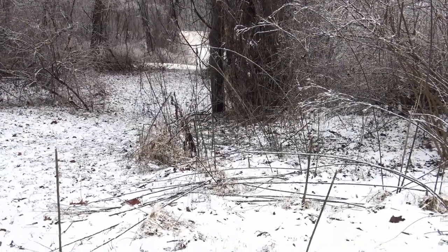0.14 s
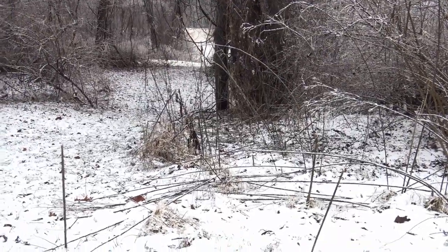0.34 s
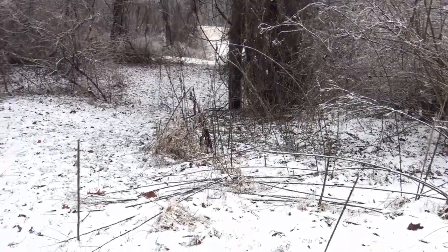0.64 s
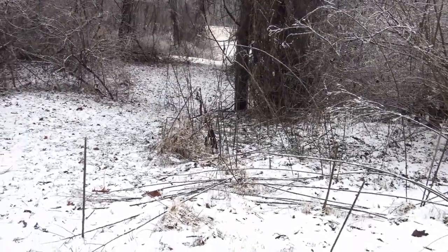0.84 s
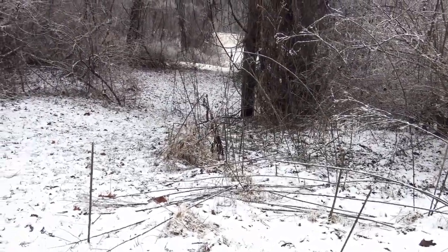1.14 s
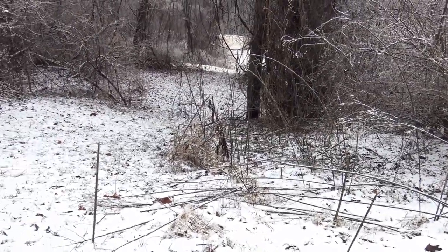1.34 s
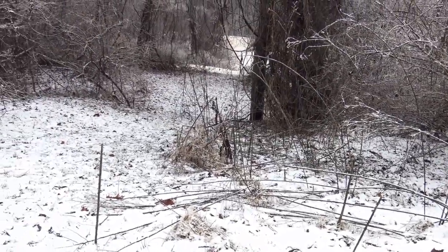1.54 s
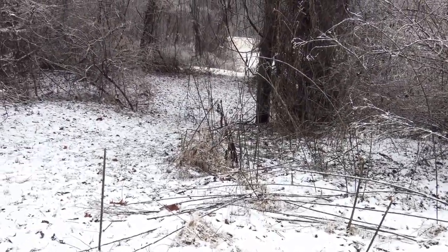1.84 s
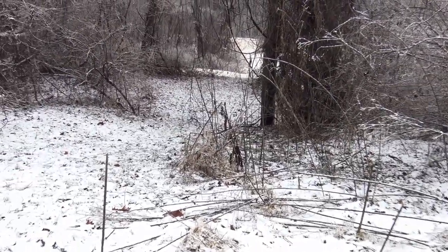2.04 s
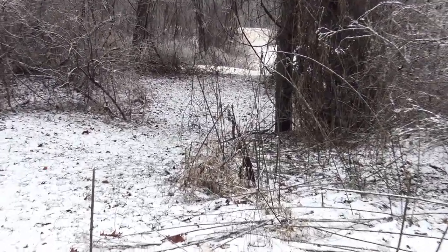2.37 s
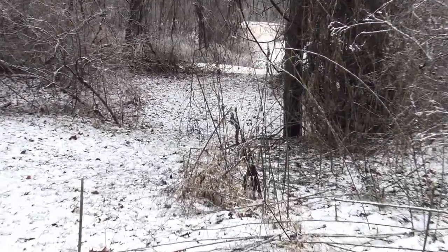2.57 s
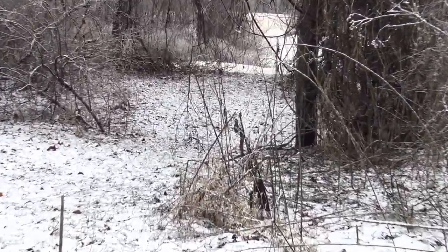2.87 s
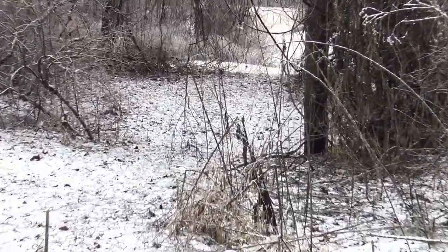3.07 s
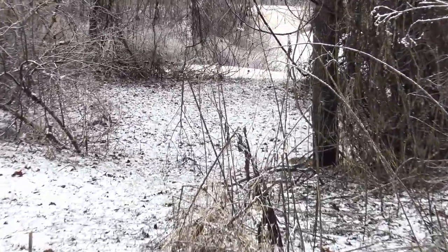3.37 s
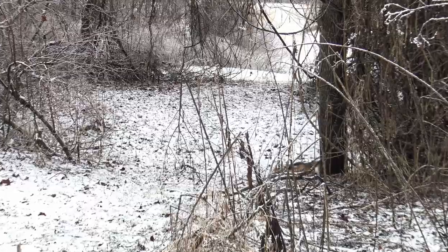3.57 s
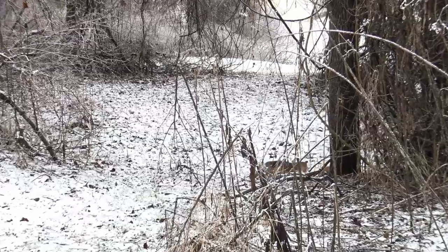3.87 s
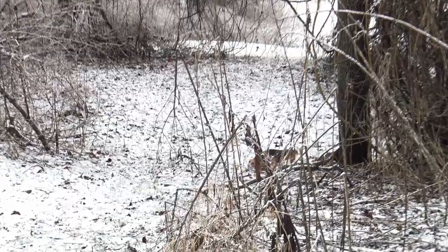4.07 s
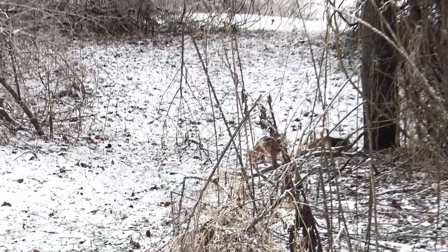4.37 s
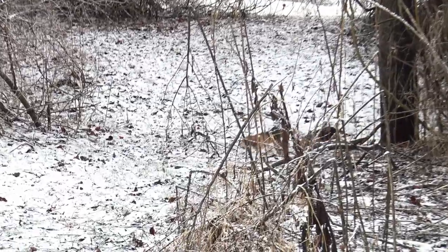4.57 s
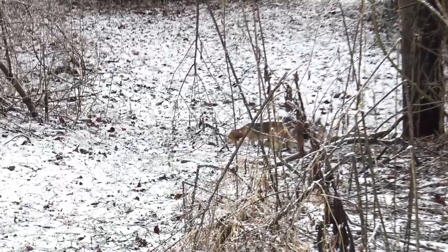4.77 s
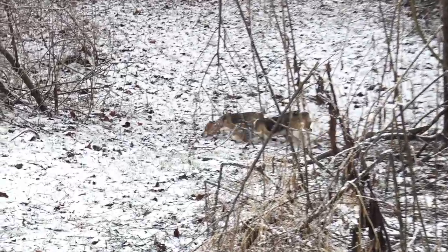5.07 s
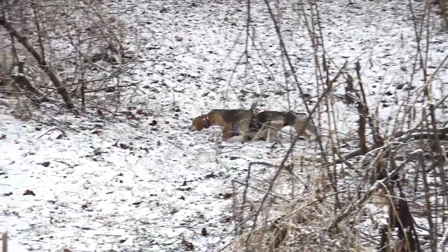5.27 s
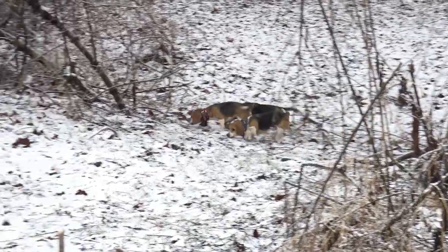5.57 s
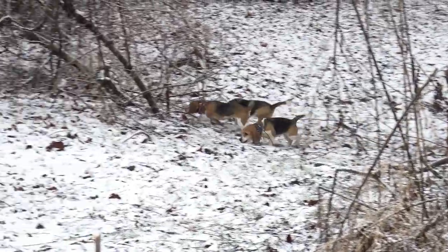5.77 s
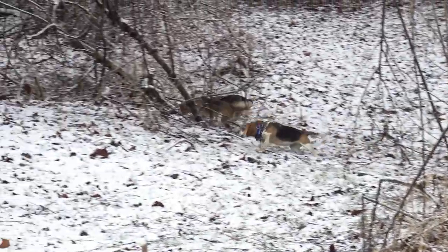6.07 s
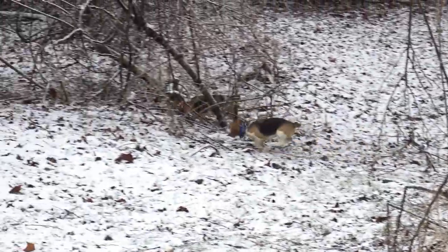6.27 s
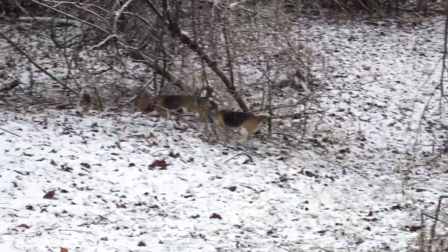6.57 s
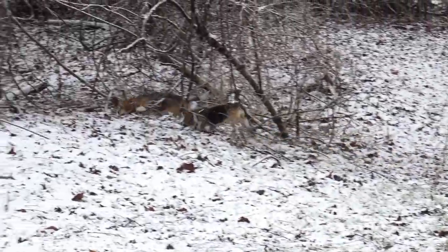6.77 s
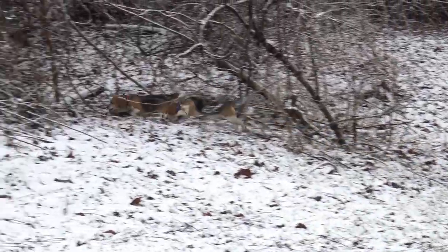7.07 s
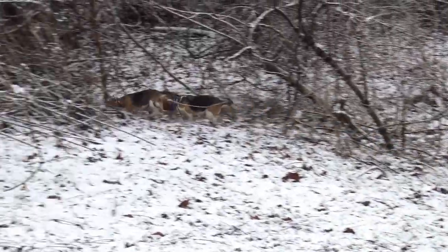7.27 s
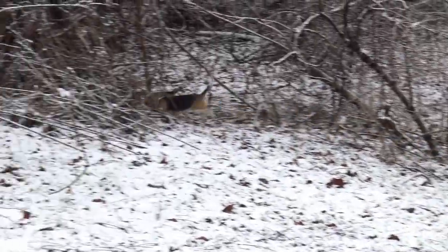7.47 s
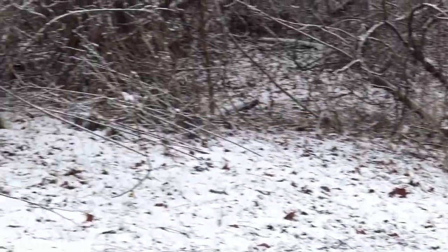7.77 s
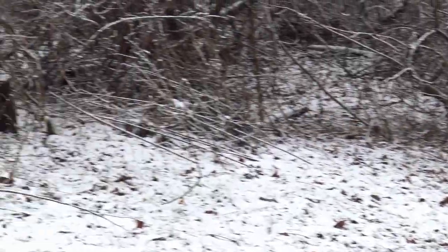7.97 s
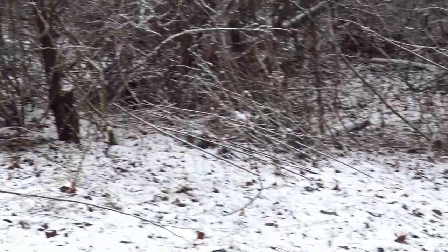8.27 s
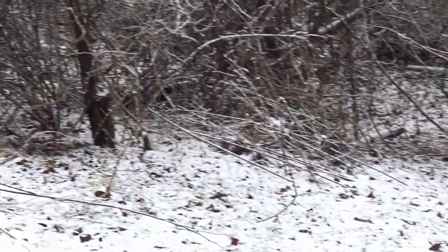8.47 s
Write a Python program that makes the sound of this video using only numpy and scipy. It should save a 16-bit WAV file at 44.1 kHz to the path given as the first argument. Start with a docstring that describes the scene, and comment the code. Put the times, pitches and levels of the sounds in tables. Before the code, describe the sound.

In a winter wood, three hunting dogs start calling almost together as several nearby twigs snap. One gives short level howls, another falling cries, and the third yelps and barks hoarsely. A louder twig cracks, and the pack keeps baying to the end, a little raspier, with quiet grunts in the gaps. The dogs are heard from a distance, slightly right of centre, with a soft echo and a gentle rush of air.

```python
"""Three hounds follow a scent through snowy woodland, some way off, over a soft, steady outdoor rush.
They open almost together, vocal folds pulsing through their mouths, as twigs snap close by: one howls
on a level note, one cries on a falling note, one yelps in head voice and breaks into a hoarse chop.
Trunks scatter each call into a soft tail, and low grunts fall in between. At 3.4 s a louder twig cracks;
the pack bays on to the end, raspier as it runs out of the brush and a little to the left."""
import sys
import numpy as np
from scipy import signal
from scipy.fft import rfft, irfft, next_fast_len
from scipy.io import wavfile
from scipy.ndimage import uniform_filter1d, minimum_filter1d, map_coordinates

SR = 44100
rng = np.random.default_rng(int(sys.argv[2]) if len(sys.argv) > 2 else 0)


def wrap_up_sound(samples):
    """Save the sound to the file named by the first command line argument, as 16-bit audio."""
    columns = np.atleast_2d(samples).T
    # keep every value between -1 and 1, then stretch to whole-number steps
    tamed = np.clip(columns, -1, 1)
    steps = np.round(tamed * 32767).astype(np.int16)
    wavfile.write(sys.argv[1], SR, steps)


N = 380583


def folds(pitch, harmonics_db, rough, waver=0.01093, jitter=0.0471, flutter_hz=400):
    """Self-sustained oscillation: harmonics and their phase; roughness varies cycle length and size."""
    n = len(pitch)
    drift = waver * (wobble(70, n) + .7 * wobble(170, n)) + jitter * rough * wobble(420, n)
    phase = 2 * np.pi * np.cumsum(pitch * (1 + drift)) / SR
    # period doubling: every other cycle is weaker in spells
    size = 1 + rough * (.32 * wobble(30, n) * np.cos(phase / 2) + .4 * wobble(300, n))
    out = np.zeros(n)
    for k, db in enumerate(harmonics_db, 1):
        chaos = np.minimum(rough * .24 * k ** 1.35, .97)
        clean = np.sqrt(1 - chaos ** 2) * np.sin(k * phase)
        torn = wobble(flutter_hz, n) * np.sin(k * phase) + wobble(flutter_hz, n) * np.cos(k * phase)
        out += amp(db) * (clean + chaos * torn / np.sqrt(2))
    return np.sqrt(2) * size * out, phase


def hound(calls, mouth, release_s, settle_s, drop, catch, jaw_lag, fade_db, open_db, rasp_db):
    """Source-filter model: jaw and mouth weight the folds' harmonics. Returns voice and rasp."""
    track = np.zeros((2, N))
    # calls: t/s, length/s, attack/s, start f/Hz, held f/Hz, end f/Hz,
    # level/dB of three bands (fundamental, second, upper harmonics), fundamental swell/dB, roughness
    for onset, length, attack, start_hz, held_hz, end_hz, *levels_db, swell_db, rough in calls:
        t, progress, gate = envelope(length, attack, release_s)
        pitch = held_hz + (start_hz - held_hz) * np.exp(-t / settle_s)
        pitch += (end_hz - held_hz) * progress ** drop
        jaw = np.sin(np.pi * progress ** jaw_lag) - 2 / np.pi  # a lag above 1 opens it late
        first, second, upper = [db + fade * (progress - .5) + wide * jaw
                                for db, fade, wide in zip(levels_db, fade_db, open_db)]
        first += swell_db * (progress - .5)
        overtones = [upper - 2 + along(mouth, k * pitch) for k in range(3, 8)]
        hoarseness = rough + catch * np.exp(-t / 0.05)
        voice, phase = folds(pitch, [first, second] + overtones, hoarseness)
        effort_db = 0.14 * first + 0.24 * second + 0.5 * upper
        add(track, onset, gate * np.array([voice, amp(effort_db + rasp_db) * throat_rasp(phase)]))
    return track


def howls():
    """Steady phonation: the first dog slides up to a level note near 600 Hz."""
    # level notes: columns as in hound
    calls = [ (0, .15, 0.017, 511, 603, 601, -26.5, -24, -32, -2, 0.3),
             (.56, 0.099, 0.018, 573.6, 593.3, 580, -16.5, -23, -27.5, 13, 0.32),
             (1.108, 0.15, 0.078, 579, 644, 642, -29.5, -16.5, -19.5, 7.5, 0.29),
             (1.546, .14, 0.046, 537, 587.6, 540, -23.5, -27.5, -22.5, 1, 0.24),
             (1.978, 0.12, 0.016, 511, 588.7, 604, -22.5, -22.5, -27.5, 8, 0.31),
             (2.41, 0.21, 0.034, 546, 595.7, 487.5, -22.5, -19.5, -27, 1, 0.31),
             (2.895, 0.14, 0.036, 542, 605, 576, -35.5, -24.5, -29, 5, 0.34),
             (3.03, 0.14, 0.028, 617.3, 622, 607.5, -21.5, -25, -28, 5.5, 0.4),
             (3.296, 0.14, 0.036, 559.4, 602.3, 520, -20.5, -24, -28, -2, 0.54),
             (3.792, 0.14, 0.038, 497, 611.6, 606, -29.5, -20, -25, -2, 0.18),
             (4.52, 0.18, 0.053, 536.6, 615.5, 583.5, -20.5, -27.5, -24, -10.5, 0.12),
             (4.948, .145, 0.031, 510, 608, 625, -19, -23.5, -28.5, 0.5, 0.18),
             (5.73, 0.126, 0.032, 622, 617.2, 598, -12.5, -19, -24, -5.5, 0.17),
             (6.328, 0.138, 0.053, 541.6, 606.4, 604, -25.5, -16, -24.5, -5, 0.13),
             (6.912, 0.16, 0.03, 572.4, 616, 610, -28, -24.5, -25.5, 2, 0.26),
             (8.305, 0.13, 0.039, 561, 623.6, 633, -29, -23, -26.5, -4, 0.52)]
    # mouth resonances: f/Hz, gain/dB
    mouth = [(1500, -6), (1820, 3), (2100, -6.5), (2450, -3), (3000, -17), (3600, -23), (5500, -36),
             (9000, -42)]
    return hound(calls, mouth, release_s=0.022, settle_s=.03, drop=5, catch=0.38, jaw_lag=1.53,
                 fade_db=[-4, 2, -6.5], open_db=[-0.5, 7.5, -0.5], rasp_db=-19)


def cries():
    """Frequency glide: the second dog's note falls from a high start, the jaw opening early."""
    # falling notes: columns as in hound
    calls = [ (.145, 0.14, 0.015, 710.6, 620, 618.5, -19, -21, -29, -5.5, 0.12),
             (1.218, 0.086, .012, 653.6, 635.4, 606, -12, -28, -27, -7.5, .25),
             (1.708, 0.14, 0.026, 604, 625, 575, -19, -21.5, -27, 12.5, 0.41),
             (2.152, 0.069, 0.01, 616, 596, 586, -22, -20.5, -18.5, -2, 0.28),
             (2.192, 0.047, 0.023, 691.6, 633, 605, -13.5, -31, -25.5, -7, 0.23),
             (2.612, 0.15, 0.021, 728.5, 579, 570.5, -30, -18, -22.5, 11, 0.24),
             (3.518, 0.1, .014, 601, 579.4, 546, -24, -18.5, -21, 15, 0.45),
             (4.14, 0.11, .02, 738, 635, 545, -14.5, -28, -29, 6.5, 0.23),
             (5.27, 0.11, 0.022, 631, 633, 629, -14, -17, -23, 2, 0.37),
             (6.138, 0.14, 0.018, 664, 599, 600, -23, -19, -22.5, 0, 0.38),
             (6.69, .13, 0.048, 592.7, 585.8, 581.3, -23, -17.5, -23.5, 19, 0.41),
             (7.112, 0.12, 0.026, 658, 614.4, 606.6, -17.5, -21, -29.5, -7.5, 0.32),
             (7.442, 0.14, 0.049, 624.7, 624, 614.3, -17, -18, -20.5, -7, 0.52),
             (7.94, 0.16, 0.031, 610.6, 596, 595.6, -19, -20.5, -23.5, -2.5, 0.44),
             (8.43, 0.13, 0.016, 621.5, 611, 597, -24, -21.5, -29.5, 2.5, 0.42)]
    # mouth resonances: f/Hz, gain/dB
    mouth = [(1500, 10), (1820, 0.5), (2100, -3.5), (2450, -3), (2720, -2), (3000, -17), (3600, -22.5),
             (5500, -25.5)]
    return hound(calls, mouth, release_s=0.01, settle_s=0.044, drop=3, catch=.08, jaw_lag=0.62,
                 fade_db=[0, 0, -11.5], open_db=[4, 4, 4], rasp_db=-20)


def chops():
    """Irregular phonation: the third dog's short, low, hoarse barks drop away at the end."""
    # barks: columns as in hound
    calls = [ (0, 0.066, 0.0017, 542.5, 519, 500, -22, -22, -27.5, -1, 0.36),
             (.405, 0.12, .025, 560, 520, 469, -31, -27, -27, -1, 0.54),
             (.762, .145, 0.044, 522, 548.4, 447, -27.5, -27, -25.5, 3, 0.54),
             (1.24, 0.11, 0.012, 570, 548.3, 482, -23, -18.5, -23, 8.5, 0.36),
             (1.64, 0.086, 0.014, 594, 566, 519, -25.5, -19.5, -29, 4.5, 0.46),
             (2.108, 0.088, 0.0071, 520, 525, 514, -23.5, -22, -27, -1, 0.31),
             (2.225, 0.054, 0.018, 564.4, 551, 466, -21, -24, -21.5, 1.5, 0.4),
             (2.935, 0.12, 0.021, 492, 531.6, 463, -21, -25.5, -32, -2, 0.55),
             (3.632, 0.13, 0.015, 558, 507, 467, -22, -26.5, -30.5, 1, 0.63),
             (4.113, 0.11, 0.013, 534, 520, 485, -21, -21.5, -29, -7.5, 0.24),
             (4.376, 0.099, 0.0085, 485.7, 517, 488, -23.5, -21.5, -26, -5, 0.26),
             (4.785, 0.098, 0.023, 466.6, 510, 479, -16.5, -25.5, -29, 4, 0.58),
             (5.173, 0.11, .01, 498.4, 543.2, 474.6, -11, -22, -29, 2, 0.21),
             (5.496, .12, 0.017, 497, 538.6, 469, -12.5, -26, -29.5, -5, 0.27),
             (6.02, 0.13, .012, 579.5, 538, 478, -15, -21.5, -20, -4, 0.39),
             (6.577, 0.14, 0.02, 476, 538, 498, -19.5, -16.5, -25, 0.5, 0.23),
             (7.026, 0.098, 0.011, 571, 509.6, 487, -23.5, -21.5, -22.5, -5, 0.59),
             (7.381, 0.11, 0.0067, 526, 492, 478, -20, -23.5, -22.5, 1, .55),
             (7.877, 0.088, .012, 523, 520, 493, -26.5, -21, -28, -3, 0.62),
             (8.405, 0.093, 0.012, 524, 498.4, 495, -36.5, -23.5, -26.5, 1, 0.39)]
    # mouth resonances: f/Hz, gain/dB
    mouth = [(1500, 0.5), (1820, -13.5), (2100, -1), (2450, -23), (3000, -30.5), (3600, -28.5),
             (5500, -24.5), (9000, -36)]
    return hound(calls, mouth, release_s=0.014, settle_s=.03, drop=4, catch=0.12, jaw_lag=0.99,
                 fade_db=[-0.5, 1.5, -10.5], open_db=[3.5, 8.5, -1], rasp_db=-20)


def yelps(arch=.02, rasp_db=-30):
    """Register break: at the edges of a chop the folds jump to a nearly pure head voice."""
    # arched glides: t/s, length/s, start f/Hz, end f/Hz, level/dB, overtone gain/dB
    notes = [ (0, 0.075, 852, 678, -23, -7), (0.382, .1, 872, 750, -20.5, -10),
             (0.518, 0.077, 690, 774, -21.5, -4), (.758, 0.037, 782, 830, -25.5, -9),
             (1.123, .025, 703, 706, -30, 5), (1.225, .032, 896, 812, -17.5, -8),
             (1.625, 0.037, 954, 768, -16.5, -15), (2.09, 0.025, 865, 790, -18.5, -17),
             (2.468, 0.068, 881, 785, -20, -2), (2.922, .04, 882, 768, -23.5, -12),
             (3.355, 0.1, 724, 734, -22, -5), (3.613, .03, 744, 710, -18.5, -14),
             (4.093, 0.024, 832, 798, -13, -15), (4.351, 0.025, 716, 763, -14.5, 0.5),
             (4.471, .032, 778, 721, -17.5, -16), (4.756, .038, 824, 791, -17, 9.5),
             (5.154, .028, 757, 772, -12, -6), (5.477, .028, 749, 700, -9.5, -7),
             (5.609, .024, 774, 663, -18, -10), (6.005, 0.032, 868, 752, -14.5, -0.5),
             (6.127, 0.036, 746, 778, -19.5, -10), (6.566, 0.027, 866, 770, -19.5, 9),
             (7.007, 0.036, 880, 863, -17, 0.5), (7.366, 0.021, 885, 840, -11.5, 0.5),
             (7.86, 0.047, 853, 755, -18.5, -2), (8.377, .13, 886, 685, -17.5, -1)]
    # overtone envelope: f/Hz, level/dB
    timbre = [(1600, -14.5), (2400, -14), (3300, -28), (4100, -26), (5700, -27), (7000, -60.5)]
    track = np.zeros((2, N))
    for onset, length, start_hz, end_hz, db, shrill_db in notes:
        _, progress, gate = envelope(length, attack=0.0091, release=0.0074)
        pitch = (start_hz + (end_hz - start_hz) * progress) * (1 + arch * np.sin(np.pi * progress))
        overtones = [shrill_db + along(timbre, k * pitch) for k in range(2, 9)]
        voice, phase = folds(pitch, [0] + overtones, rough=.1)
        rasp = amp(rasp_db + shrill_db) * throat_rasp(phase)
        add(track, onset, gate * amp(db) * np.array([voice, rasp]))
    return track


def scoops():
    """Formant resonance: sliding up into a cry, the second and fourth harmonics ring in the mouth."""
    # clean upward glides: t/s, length/s, start f/Hz, end f/Hz, level/dB
    glides = [(.128, 0.0354, 616.4, 686, -27), (1.711, .03, 622, 716, -30), (2.132, .024, 671, 709, -20),
              (2.596, 0.043, 601, 722, -27.5), (3.5, 0.03, 622, 738, -25), (4.125, 0.03, 628, 701, -26),
              (5.252, 0.025, 670, 728, -29), (6.127, 0.032, 604, 661, -18), (6.687, 0.029, 590, 707, -26),
              (7.1, 0.0274, 614, 675, -27), (7.428, .028, 656, 670, -30), (7.929, 0.024, 620, 633, -24)]
    # mouth resonances: f/Hz, gain/dB
    mouth = [(650, 1), (1350, 1), (2000, -14.5), (2720, 3), (3400, -28.5), (5500, -18.5)]
    track = np.zeros(N)
    for onset, length, start_hz, end_hz, db in glides:
        _, progress, gate = envelope(length, attack=0.0097, release=0.015)
        pitch = start_hz + (end_hz - start_hz) * progress
        harmonics = [db + along(mouth, k * pitch) for k in range(1, 9)]
        add(track, onset, gate * folds(pitch, harmonics, rough=.04, waver=.003)[0])
    return track


def throat_rasp(phase, air_db=3):
    """Pulsed turbulence: air escapes once a cycle, over the high harmonics of the fold pulses."""
    k = np.arange(4, 25)[:, None]
    buzz = unit(np.sin(k * phase + rng.uniform(0, 2 * np.pi, k.shape)).sum(0))
    puffs = unit((1 + np.cos(phase)) * rng.standard_normal(len(phase)))
    return unit(buzz + amp(air_db) * puffs)


def muzzle(voice):
    """Radiation: the calls' low notes leave the muzzle weakly."""
    # response: f/Hz, gain/dB
    radiation = [(100, -41.5), (230, -26), (315, -8), (400, -13.5), (490, -10), (600, 2), (3000, -1),
                 (12000, -21)]
    return coloured(voice, radiation)


def rasp_tone(rasp):
    """Spectral shaping of the rasp; the level of its highest hiss rises and falls."""
    # spectrum: f/Hz, gain/dB
    colour = [(2000, -17), (3000, 9), (3500, -5.5), (4100, 2), (5800, 3), (7200, 0.5), (9500, -7.5),
              (11200, -22.5), (13300, -22.5), (15500, -27.5)]
    # hiss above 10 kHz: t/s, gain/dB
    treble_db = [(0, 5.5), (1.2, -2), (1.699, 10), (2.3, -4.5), (3.1, -2), (3.599, 8), (4.4, -1.5),
                 (6, 3.5), (7.3, 8), (7.8, -1), (8.6, -8)]
    rasp = coloured(rasp, colour)
    treble = filtered(rasp, lambda hz: np.interp(hz, [9000, 11500], [0, 1]))
    return rasp - treble + treble * amp(contours(treble_db)[0])


def grunts(overtone_db=-14):
    """Low-tension vibration: slack folds glide through a short, low note in uneven lumps."""
    # grunts and whines: t/s, length/s, start f/Hz, end f/Hz, level/dB, roughness
    notes = [(.51, 0.16, 345, 441, -44.5, .05), (1.81, .09, 163, 111, -47, .8),
             (4.18, 0.077, 330, 288, -46.5, .3), (4.94, 0.062, 230, 100, -42, .9),
             (5.29, 0.087, 330, 302, -39.5, .3), (5.84, 0.097, 238, 141, -46.5, .9),
             (6.18, .1, 259, 110, -38.5, .9), (6.77, 0.095, 344, 130, -41.5, 1),
             (7.19, .07, 277, 152, -47.5, 1), (7.48, 0.056, 350, 303, -38.5, .3),
             (7.56, .07, 231, 123.5, -42, .9), (8.04, .09, 260, 122.3, -42, .9),
             (8.419, 0.113, 260, 298, -45, 1.1)]
    track = np.zeros(N)
    for onset, length, start_hz, end_hz, db, rough in notes:
        progress = np.linspace(0, 1, int(length * SR))
        pitch = start_hz * (end_hz / start_hz) ** progress
        growl = folds(pitch, [0, overtone_db], rough, flutter_hz=120)[0]
        swell = np.abs(np.sin(np.pi * progress ** 1.3)) ** .7
        lumps = unit(amp(2.5 * wobble(60, len(pitch))) * swell)
        add(track, onset, amp(db) * lumps * growl)
    return track


def swinging(x):
    """Directivity and interference: swinging heads and changing paths move spectral peaks and notches."""
    # spectral ripple: f/Hz, depth/dB
    depth = [(900, 0), (1400, .6), (1900, 2), (3000, 4), (12000, 5.5)]
    hz, _, spectra = signal.stft(x, SR, nperseg=512)
    ripple = uniform_filter1d(rng.standard_normal(spectra.shape), size=6, axis=0)
    ripple = unit(uniform_filter1d(ripple, size=12, axis=1))
    gain = amp(along(depth, hz)[:, None] * np.clip(ripple, -2, 2))
    gain /= np.sqrt(np.mean(gain ** 2, axis=1, keepdims=True))
    return signal.istft(spectra * gain, SR, nperseg=512)[1][:N]


def woods(x, build_s=0.0062, near_db=2, near_t60=0.21, positions=16):
    """Scattering: near trunks answer at once, far ones in a tail; the pattern changes as the dogs run."""
    # reverberation time: f/Hz, t60/s
    far_t60 = [(150, 0.25), (600, 0.9), (1300, 0.77), (2500, 0.8), (5000, 1), (12000, 0.97)]
    out, hop = np.zeros(N), N / (positions - 1)
    for i in range(positions):
        hz, t, spectra = signal.stft(rng.standard_normal(SR), SR, nperseg=256)
        fade = amp(-60 * t / along(far_t60, hz)[:, None]) + amp(near_db - 60 * t / near_t60)
        tail = signal.istft(spectra * fade * (1 - np.exp(-t / build_s)), SR, nperseg=256)[1]
        tail /= np.sqrt(np.mean(np.abs(rfft(tail, SR)[500:2000]) ** 2))  # unit gain at 500-2000 Hz
        span = np.arange(max(int((i - 1) * hop), 0), min(int((i + 1) * hop), N))
        crossfade = np.cos(np.pi / 2 * (span / hop - i))
        add(out, span[0] / SR, signal.fftconvolve(x[span] * crossfade, tail))
    return out


def twigs(gain_db=-3, t60=0.01, splinter_db=-22, splinter_t60=0.078):
    """Brittle fracture: a dry twig cracks in a broadband burst and its splinters settle."""
    # cracks: t/s, level/dB
    snaps = [(0.0775, -20.5), (0.107, -19), (0.14, -22), (0.202, -22), (0.3157, -18.5), (0.5782, -15),
             (3.4252, -9.5), (3.433, -28)]
    track, t = np.zeros(N), np.arange(SR // 10) / SR
    for onset, db in snaps:
        fade = amp(-60 * t / t60) + amp(splinter_db - 60 * t / splinter_t60)
        add(track, onset, amp(db + gain_db) * fade * rng.standard_normal(len(t)))
    return coloured(track, [(400, -7), (1500, 10), (4500, 4.0), (7000, -4), (15000, -22.5)])


def still_air():
    """Ambient noise: a soft, steady rush around 1 kHz, a little rumble beneath and a faint, wide hiss."""
    # outdoor spectrum: f/Hz, density level/dB
    rush = [(20, -24.5), (40, -1), (65, 1), (100, -0.5), (170, 1), (300, -9.5), (1000, 5), (3500, -20.5),
            (7000, -22.5), (10000, -25.5), (13000, -35.5), (16000, -54.5)]
    hiss = [(50, 10.5), (500, -4), (8000, -17), (11000, -10), (14000, -28.5)]
    return amp(-39) * noise(rush) * amp([[.8], [-.8]]) + amp(-59.5) * np.array([noise(hiss), noise(hiss)])


def amp(db):
    """Decibels to gain."""
    return 10 ** (np.asarray(db) / 20)


def unit(x):
    """Normalisation to rms 1."""
    return x / np.sqrt(np.mean(x ** 2) + 1e-20)


def along(points, hz):
    """Interpolation of (f/Hz, value) points on a log axis."""
    f, values = np.transpose(points)
    return np.interp(np.log(hz + 1), np.log(f + 1), values)


def contours(points):
    """Interpolation of (t/s, values...) rows, one curve a value column."""
    times, *columns = np.transpose(points)
    return [np.interp(np.arange(N) / SR, times, column) for column in columns]


def filtered(x, response):
    """Zero-phase filtering by a function of frequency."""
    n = x.shape[-1]
    padded = next_fast_len(n + 8192)
    return irfft(rfft(x, padded) * response(np.fft.rfftfreq(padded, 1 / SR)), padded)[..., :n]


def coloured(x, spectrum):
    """Spectral shaping by (f/Hz, gain/dB) points."""
    return filtered(x, lambda hz: amp(along(spectrum, hz)))


def noise(spectrum):
    """Coloured noise of rms 1."""
    return unit(coloured(rng.standard_normal(N), spectrum))


def wobble(rate, n):
    """Smooth random modulation: n samples, rate knots a second."""
    return map_coordinates(rng.standard_normal(1024), [np.arange(n) * rate / SR], mode="wrap")


def add(track, onset, x):
    """Superposition of x on the track from onset/s."""
    part = track[..., max(round(onset * SR), 0):][..., :x.shape[-1]]
    part += x[..., :part.shape[-1]]


def envelope(length, attack, release):
    """Amplitude envelope of a call: t/s, progress 0-1 and the attack-hold-release gate."""
    t = np.arange(0, length + release, 1 / SR)
    rise = np.sin(np.pi / 2 * np.clip(t / attack, 0, 1)) ** 2
    fall = np.clip((length + release - t) / release, 0, 1) ** 2
    return t, np.minimum(t / length, 1), rise * fall


def scene():
    """Superposition in mid-side stereo: the pack, its echo, the twigs and the still air."""
    # the run out of the brush and leftward: t/s, rasp gain/dB, left minus right/dB
    path = [(0, -1.5, -2.9), (3.001, 0.5, -2), (5, 2.5, -2.5), (8.63, 2.5, -1.5)]
    clear_db, pan_db = contours(path)
    voice, rasp = howls() + cries() + chops() + yelps()
    dogs = swinging(muzzle(voice + scoops()) + rasp_tone(rasp * amp(clear_db))) + grunts()
    mid = dogs + amp(-5.5) * woods(dogs) + twigs()
    # the echo is wide only in the treble
    side = coloured(woods(dogs, positions=3), [(600, -39.5), (2500, -42.5), (5000, -18.5), (9000, -7.5)])
    return mid * amp([pan_db / 2, -pan_db / 2]) + np.array([side, -side]) + still_air()


def record(dry, ceiling=.85, top_hz=15700):
    """Peak limiting holds the loudest barks down; a low-pass sets the band limit."""
    needed = np.minimum(1, ceiling / (np.abs(dry).max(0) + 1e-9))
    gain = uniform_filter1d(minimum_filter1d(needed, size=700), size=500)
    return filtered(dry * gain, lambda hz: hz < top_hz)


dry = scene()
out = record(dry)
wrap_up_sound(out)
```